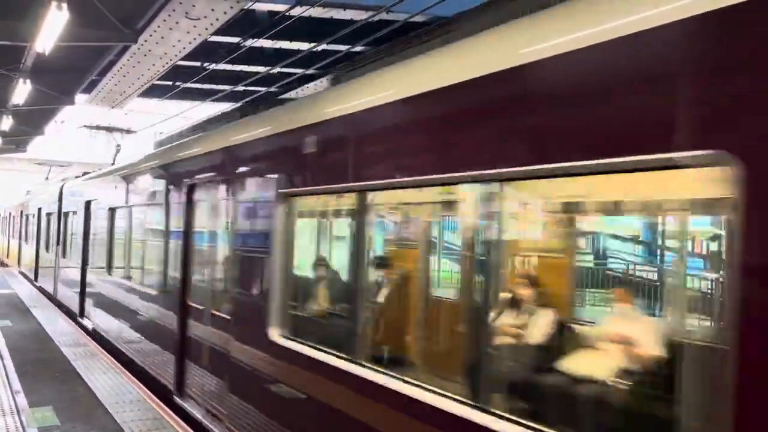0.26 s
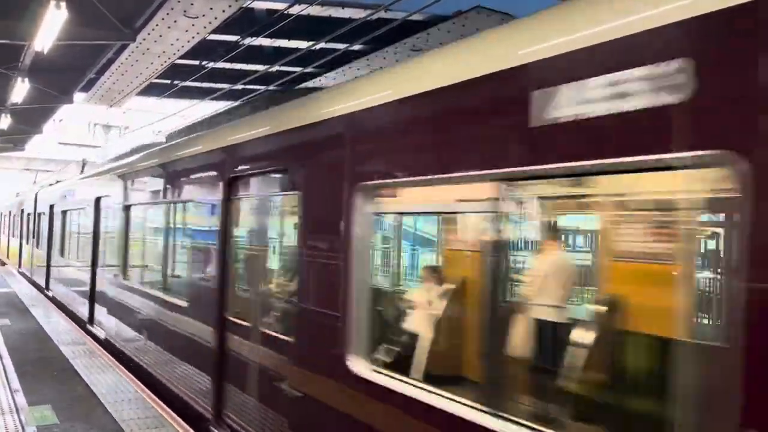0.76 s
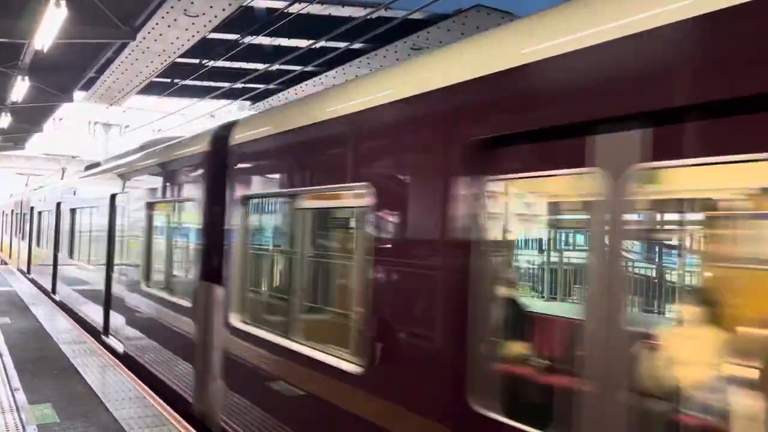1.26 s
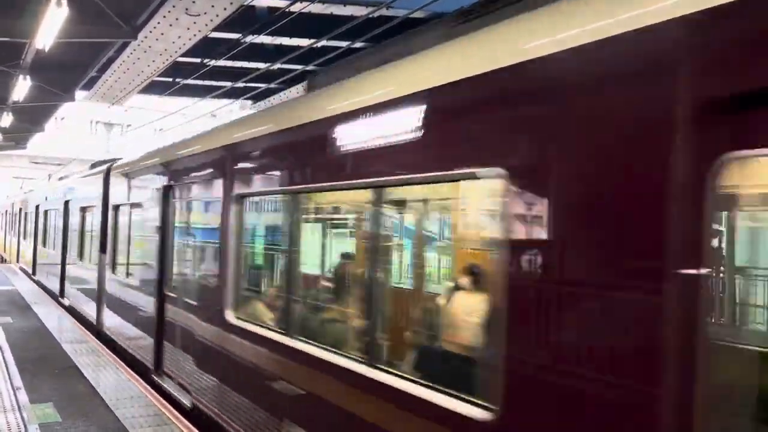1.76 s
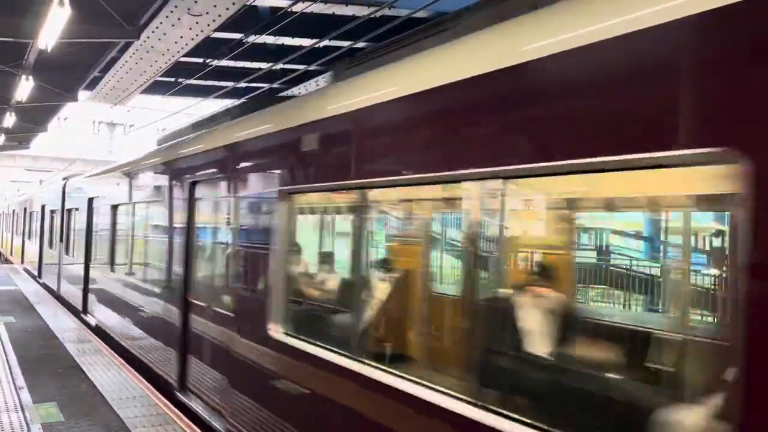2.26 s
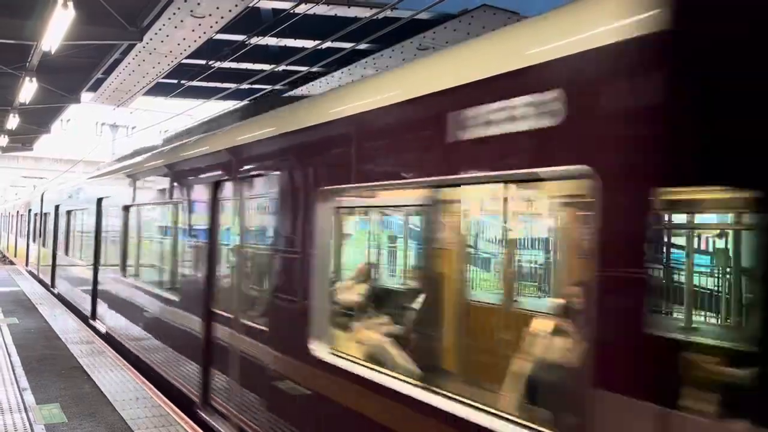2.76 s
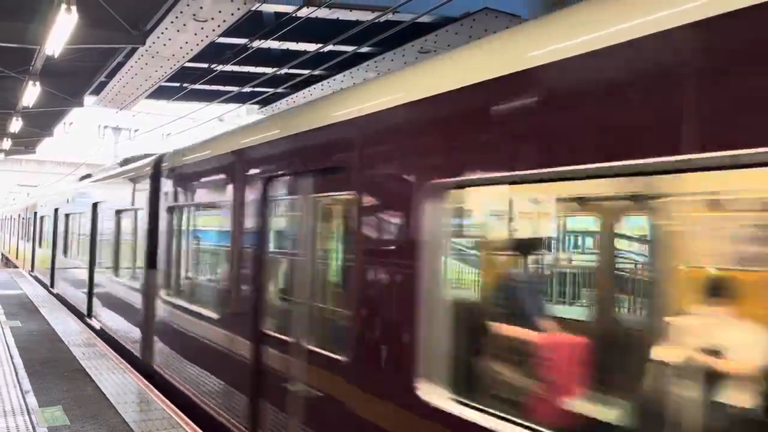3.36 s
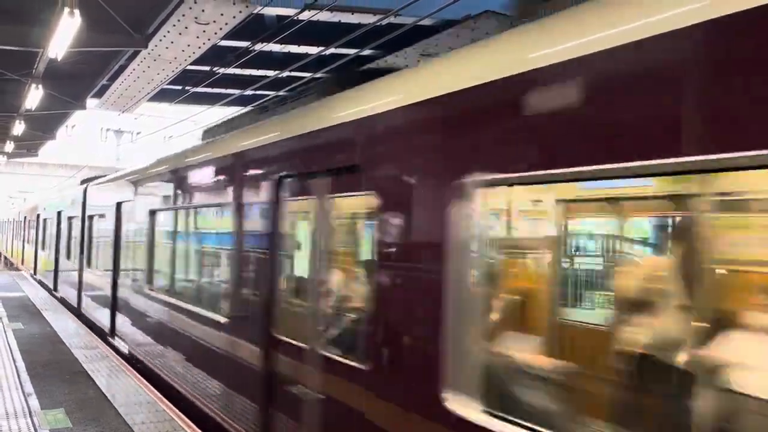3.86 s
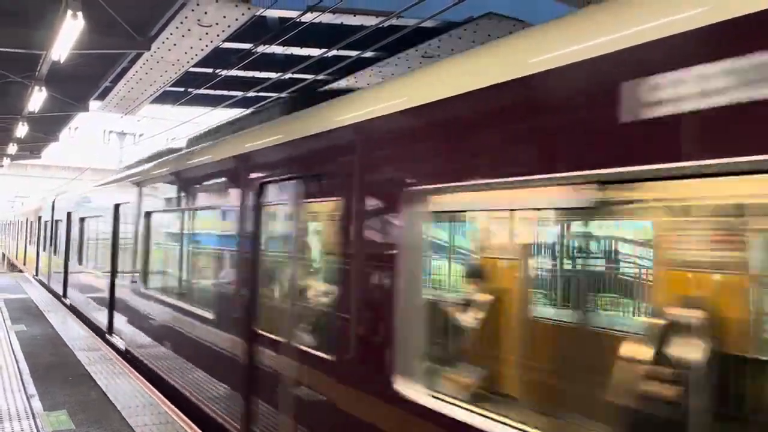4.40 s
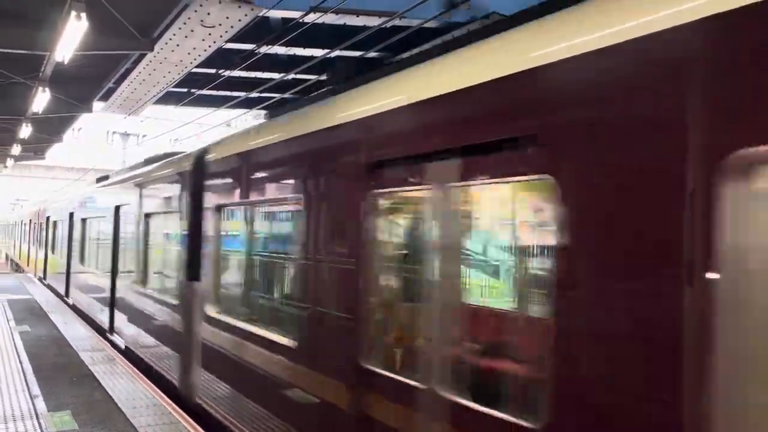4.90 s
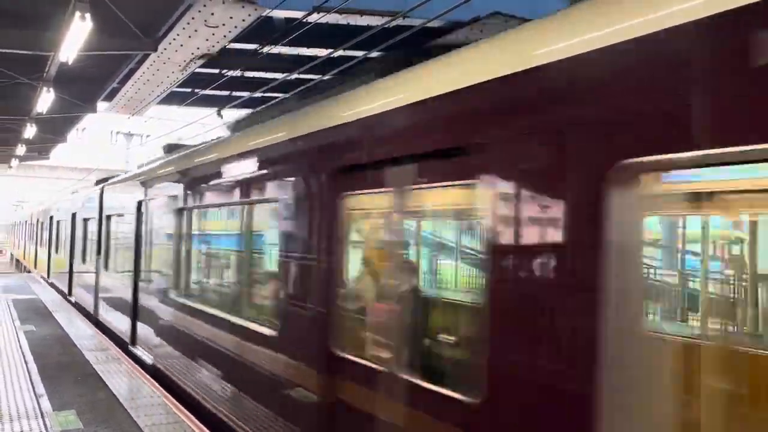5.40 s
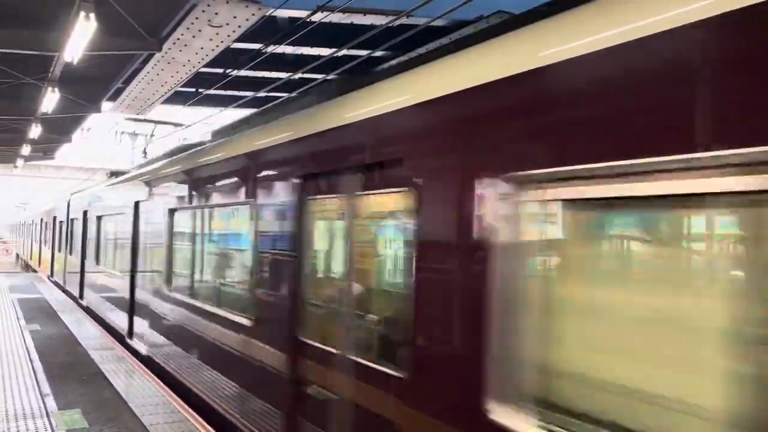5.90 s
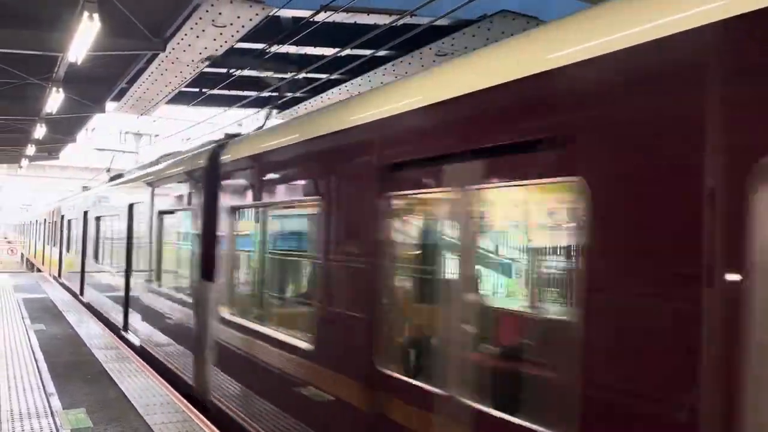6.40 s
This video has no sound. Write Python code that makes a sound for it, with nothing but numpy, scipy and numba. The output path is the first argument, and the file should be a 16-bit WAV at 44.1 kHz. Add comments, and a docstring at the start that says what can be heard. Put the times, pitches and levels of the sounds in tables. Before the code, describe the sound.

Very close stereo phone pickup on a station platform as train cars rush by, accelerating. Wheels roar continuously with a soft hiss; motors sing in wavering, slightly out-of-tune clusters that rise throughout, over a constant electrical hum. Wind from the cars first batters the microphone, then eases, returns in scattered low bumps and crackling puffs, and finally becomes dense.

```python
"""Commuter train gathering speed

An electric train gathers speed along a roofed platform, an arm's length from a phone.
Gears, motor fans and a fixed hum are clusters of detuned sines; all but the hum rise in pitch.
Wheels on rail roar as octave bands of noise. The slipstream buffets the microphone:
gust-shaped noise, with dull thumps made of sines whose pitch falls."""
import sys
import numpy as np
from scipy import signal
from scipy.fft import irfft, next_fast_len
from scipy.io import wavfile
from numba import njit

SR = 44100
rng = np.random.default_rng(int(sys.argv[2]) if len(sys.argv) > 2 else 0)


def persist_wave(psi):
    """Save psi, clipped to +-1, as 16-bit WAV."""
    counts = np.round(np.clip(psi, -1, 1) * 32767).astype(np.int16)
    wavfile.write(sys.argv[1], SR, np.atleast_2d(counts).T)


def volts_from_decibels(level):
    """Turn decibel levels (scalar or array-like) into linear amplitude factors."""
    exponent = np.asarray(level, float) / 20
    return 10 ** exponent


N = 293265
TIME = np.arange(N) / SR


def curves(table):
    """Linear interpolation: the columns of a timed table, one value per sample."""
    s, *columns = np.transpose(table)
    return [np.interp(TIME, s, column) for column in columns]


def along(table, hz):
    """Logarithmic frequency scale: reads (frequency, value) points along it."""
    f, value = np.transpose(table)
    return np.interp(np.log(np.maximum(hz, 1)), np.log(f), value)


def unit(x):
    """Normalisation of power: scales to rms 1."""
    return x / np.sqrt(np.mean(x ** 2))


def walk(rate):
    """Random modulation: Gaussian levels joined by straight lines, rate of them a second."""
    knots = rng.standard_normal(2500)
    return 1.2 * np.interp(TIME * rate, np.arange(len(knots)), knots)  # rms near 1


def pair(spectrum, likeness, lo_hz=0., hi_hz=SR):
    """Partial coherence: two ears share a mid noise and differ by a side noise, in a soft-edged band."""
    size = next_fast_len(N)
    hz = np.fft.rfftfreq(size, 1 / SR) + 1
    phases = np.exp(2j * np.pi * rng.random((2, len(hz))))
    mid, side = rng.standard_normal((2, len(hz))) * phases
    alike = np.clip(likeness(hz), -1, 1)
    edges = np.sqrt((1 + (lo_hz / hz) ** 6) * (1 + (hz / hi_hz) ** 6))
    gain = volts_from_decibels(along(spectrum, hz)) / edges
    common, opposed = np.sqrt(1 + alike) * mid, np.sqrt(1 - alike) * side
    return irfft(gain * np.array([common + opposed, common - opposed]), size)[:, :N]


# level difference between the ears: (frequency [Hz], left minus right [dB])
EAR_DIFFERENCE = [(500, 0.8), (1200, -1), (2300, 2), (4200, 6), (7500, 3), (12000, -9)]


def ear_gains(hz):
    """Interaural level difference: half of it raises the left, half lowers the right."""
    lean_db = along(EAR_DIFFERENCE, hz) / 2
    return volts_from_decibels([[lean_db], [-lean_db]])


# train speed heard as pitch: (time [s], gear mesh [Hz], motor fan blade [Hz])
SPEED = [(0.0, 273, 905), (0.7, 303.4, 963.4), (1.32, 329.4, 1081), (1.9, 349.3, 1122), (2.64, 372.5, 1141),
         (3.5, 392, 1213), (4.4, 416.1, 1318), (5.2, 434.7, 1354), (5.9, 450.7, 1385), (6.65, 466.9, 1417)]
# fan tones of the motors: (time [s], pitch spread [share of pitch], steady share [ratio])
FAN_SPREAD = [(0, .015, .6), (1, .015, .6), (1.35, .05, .9), (1.95, .05, .9), (2.3, .055, .3), (4, .055, 0),
              (5.5, .022, .8), (6.2, .012, 1.2), (6.45, .01, 1.6), (6.65, .018, .8)]
# gear tones: (tone, multiple of the mesh [ratio], pitch spread [share of pitch], steady share [ratio])
GEAR_ORDERS = [("mesh", 1, .06, 1.4), ("mesh x2", 2, .035, .3), ("mesh x4", 4, .03, 0),
               ("mesh x5", 4.85, .02, .3), ("mesh x6", 6, .042, .35), ("mesh x8", 7.9, .055, 0),
               ("mesh x10", 9.7, .05, 0)]


def motors():
    """Tooth and blade passing: gear and fan tones rise with speed; the hum stays put."""
    hum_hz = 112.3
    mesh_hz, fan_hz = curves(SPEED)
    out = whine("fan", fan_hz, *curves(FAN_SPREAD))
    for tone, order, spread, steady in GEAR_ORDERS:
        count = 5 if steady > .3 else 3
        gear = whine(tone, order * mesh_hz, spread, steady, count)
        out += gear * ear_gains(order * mesh_hz.mean())
    for order, tone in enumerate(("hum", "hum x2"), 1):
        # one channel of the hum feeds both ears
        out += whine(tone, np.full(N, order * hum_hz), .2 / order, 0)[0]
    return out


def whine(tone, hz, spread, steady, count=5):
    """Multipath interference: motors nearing or leaving sing a little off pitch, roughened by many paths."""
    waver_db, waver_per_s = 1.07, 11  # gaps and skirts of the cars break each tone up
    db, offset = passing(tone)
    out = np.zeros((2, N))
    rough_rate = 1.5 * np.mean(spread * hz)
    for off in np.linspace(-1, 1, count):
        detuning = offset / 100 + spread * (off + .15 * walk(6))
        phase = 2 * np.pi * np.cumsum(hz * (1 + detuning)) / SR
        gain = volts_from_decibels(1.8 * walk(12) - 7. * off ** 2)
        # only the middle motor has a steady part
        direct = (steady * (off == 0) + 0.67 * walk(rough_rate)) * np.sin(phase)
        # roof and car sides give each ear its own shifting mix of paths
        for ear in range(2):
            paths = walk(rough_rate) * np.sin(phase) + walk(rough_rate) * np.cos(phase)
            out[ear] += gain * (direct + paths)
    depth_db = waver_db / (1 + steady) ** 2  # steadier tones waver less
    return unit(out) * volts_from_decibels(db + depth_db * walk(waver_per_s))


# a tone swells while a unit that sings it rolls past:
# (tone, nearest time [s], level [dB], time scale of the swell [s], pitch offset of that unit [%])
PASSES = [("mesh", 1.11, -32, 0.1697, 0.12), ("mesh", 1.74, -30, 0.2597, -0.994),
          ("mesh", 2.52, -31.5, 0.33, -3), ("mesh", 2.8, -30, 0.369, 0.99),
          ("mesh", 3.26, -30.5, 0.22, 1.5), ("mesh", 3.65, -32.5, 0.2, 1), ("mesh", 4.3, -32.5, 0.16, 0.11),
          ("mesh", 4.66, -27.5, 0.05, .5), ("mesh", 4.76, -28, 0.084, .5), ("mesh", 4.88, -28, 0.04, -1.06),
          ("mesh", 4.97, -25.5, 0.08, 1.53), ("mesh", 5.065, -26, 0.039, 1.53),
          ("mesh", 5.7, -35.5, 0.42, 0.12), ("mesh", 5.6, -35, 0.15, 0.14),
          ("mesh", 6.45, -27.5, 0.084, 0.14), ("mesh x2", 0.16, -33, 0.503, -0.991),
          ("mesh x2", 1.495, -32.5, 0.3426, 0.12), ("mesh x2", 1.918, -34, 0.15, .5),
          ("mesh x2", 2.24, -31, 0.15, -.7), ("mesh x2", 2.6, -35, 0.21, -1),
          ("mesh x2", 3.08, -28.5, 0.23, -1.5), ("mesh x2", 3.6, -31.5, 0.297, -3),
          ("mesh x2", 4.09, -31, 0.244, -3.5), ("mesh x2", 4.47, -34, 0.121, -2.51),
          ("mesh x2", 4.85, -29, 0.131, -3.5), ("mesh x2", 5.15, -38, 0.12, -2.404),
          ("mesh x2", 5.89, -33.5, 0.22, 0.093), ("mesh x2", 6.23, -33.5, 0.11, -.5),
          ("mesh x5", 5.93, -42, .15, -.5), ("mesh x5", 6.3, -42.5, .16, -3),
          ("mesh x4", 2.25, -40, 0.33, 0.1023), ("mesh x4", 3.3, -42, .5, 0.1014),
          ("mesh x4", 4.76, -42, 0.3, 2), ("mesh x4", 5.95, -41, 0.12, 0.11),
          ("mesh x6", 0.16, -45, 0.408, 0.1017), ("mesh x6", 2.4, -38.5, 0.22, 0.497),
          ("mesh x6", 2.76, -35.5, 0.288, 0.0973), ("mesh x6", 3.2, -32.5, 0.25, -1),
          ("mesh x6", 3.55, -32, 0.2516, 0.501), ("mesh x6", 3.92, -36.5, 0.15, 0.505),
          ("mesh x6", 4.22, -32.5, 0.204, -0.508), ("mesh x6", 4.72, -36.5, 0.36, -2.2),
          ("mesh x6", 5.14, -37, 0.248, -1.5), ("mesh x6", 5.45, -38, 0.127, -2.2),
          ("mesh x6", 5.65, -41, .1, -2), ("mesh x6", 5.79, -37.5, .08, -1.5),
          ("mesh x6", 6.08, -41, 0.22, -2.5), ("mesh x6", 6.4, -40, 0.13, 0.99),
          ("mesh x6", 6.58, -40, 0.14, -2), ("mesh x8", 4.65, -41, 0.4, .1),
          ("mesh x8", 5.5, -42.5, 0.45, -1), ("mesh x10", 4.33, -42, .14, 2),
          ("mesh x10", 4.6, -44.5, .2, 1), ("mesh x10", 4.95, -42, 0.25, -.5),
          ("mesh x10", 5.8, -46.5, 0.64, -2), ("fan", 0.617, -38, 0.19, 0.09),
          ("fan", 1.365, -31, 0.099, 1), ("fan", 1.53, -30.5, 0.13, .5), ("fan", 1.72, -28.5, 0.16, 1),
          ("fan", 1.89, -30, 0.088, 1.497), ("fan", 2.12, -35, 0.15, 2), ("fan", 2.34, -32, 0.08, 1),
          ("fan", 2.54, -29.5, 0.1695, 0.094), ("fan", 2.72, -31.5, 0.08, .1),
          ("fan", 3.35, -36.5, 0.5, -3), ("fan", 4.3, -40.5, 0.2974, 0.096), ("fan", 5.05, -39, 0.2036, 1),
          ("fan", 5.4, -41, 0.14, 0.96), ("fan", 5.78, -35.5, 0.199, 1.5),
          ("fan", 6.08, -33.5, 0.199, 0.082), ("fan", 6.39, -33, 0.099, 0.083),
          ("fan", 6.6, -33, 0.045, 0.56), ("hum", 0.1, -34, .1, .1), ("hum", 0.63, -33.5, 0.19, .1),
          ("hum", 1.26, -28.5, 0.08, 0.13), ("hum", 1.5, -28.5, 0.21, 0.13), ("hum", 2.74, -36, 0.34, 0.12),
          ("hum", 3.21, -37, 0.15, 0.11), ("hum", 4.45, -36, .15, 0.11), ("hum", 4.8, -41, 0.099, .1),
          ("hum", 6.1, -35, 0.14, .1), ("hum x2", 0.078, -31.5, 0.083, 0.079),
          ("hum x2", 1.0, -35, 0.58, .1), ("hum x2", 1.58, -33, 0.19, 0.086),
          ("hum x2", 2.32, -29, 0.21, 0.073), ("hum x2", 3.5, -35, 0.15, 0.098),
          ("hum x2", 2.876, -29.5, 0.1, 0.085), ("hum x2", 5.14, -38.5, 0.45, 0.11),
          ("hum x2", 6.62, -33, 0.1, 0.091)]


def passing(tone):
    """Spreading loss: level summed over units that fade with distance; the loudest leads the pitch offset."""
    steepness = 2.63
    rows = [row[1:] for row in PASSES if row[0] == tone]
    power = np.array([volts_from_decibels(2 * db) / (1 + ((TIME - s) / half) ** 2) ** steepness
                      for s, db, half, _ in rows])
    total = power.sum(axis=0)
    offsets = np.array(rows)[:, -1]
    return 10 * np.log10(total), offsets @ power / total


# rolling roar: (time [s], level [dB], treble band against the rest [dB])
ROLLING = [(0.0, -28, 0), (1.15, -29, -0.5), (1.5, -26.5, 3), (1.9, -27.5, 0.5), (2.9, -26.5, -2.5),
           (3.5, -26.5, 2), (4.05, -25.5, 0), (5.2, -27, 0), (5.8, -26, 1), (6.65, -26, 1)]
# relative spectral density of the roar: (frequency [Hz], density [dB per Hz])
ROAR = [(40, -2), (70, -3.5), (130, -2.5), (250, -5), (450, -9.5), (800, -9), (1300, -11), (2000, -16),
        (2800, -18.5), (4300, -21), (6000, -32), (8200, -35), (11500, -42), (13800, -45)]
# likeness of the ears; the gap between the ports makes it swing in the treble:
# (frequency [Hz], left-right correlation [ratio, clipped to -1..1])
LIKENESS = [(100, 0.59), (350, 0.61), (900, 0.22), (1400, 0.061), (3000, 0.22), (6200, 0.29), (7400, -0.62),
            (7650, -1.16), (9300, -0.84), (9400, -0.57), (10100, 0.19), (11000, 1.05), (13300, 0.86),
            (14250, -1.8)]


def wheels():
    """Roughness excitation of wheel and rail: octave bands flicker alone, swelling as bogies pass."""
    drone_db = 2.5  # bands below 3 kHz, against the hiss above
    db, treble_db = curves(ROLLING)
    out = np.zeros((2, N))
    for hz in 30 * 2. ** np.arange(9):
        band = pair(ROAR, lambda f: along(LIKENESS, f), hz, 2 * hz)
        flicker_db = 0.5 * walk(3.92) + 1.29 * walk(13)
        balance_db = drone_db * (hz < 3000) + treble_db * (hz > 7000)
        out += band * volts_from_decibels(flicker_db + balance_db) * ear_gains(1.16 * hz)
    return unit(out) * volts_from_decibels(db)


# relative spectral densities of the wind noises: (frequency [Hz], density [dB per Hz])
RUMBLE = [(20, -32), (40, -11), (60, 7), (90, 0.5), (130, -7), (600, -89)]
BUFFET = [(50, -32), (95, 12.5), (115, 5.5), (160, 7), (240, -11.5), (350, -33), (1500, -92)]
FLUTTER = [(120, -8), (260, -1), (500, -2.5), (900, -14.5), (1500, -23), (5000, -100)]
SNAP = [(300, -17), (650, 3.5), (1100, -7.5), (1800, -14.5), (6000, -90)]
# strongest eddies: (time [s], level [dB], snap against the swing [dB],
# start pitch before wobble [Hz], life scale [s])
EDDIES = [(0.009, -16, -18, 400, .016), (0.052, -14, -16, 397, .012), (0.092, -16.5, -6, 402, 0.015),
          (0.12, -20.5, -22, 300, 0.012), (0.22, -18, -24, 278, 0.015), (0.274, -9, -16, 516, 0.0052),
          (0.31, -21, -18, 400, 0.0073), (0.36, -15, -9, 352, 0.0082), (0.405, -18, -20, 350, .008),
          (0.452, -17.5, -22, 397, 0.012), (0.54, -18, -18.5, 392, 0.0095), (1.046, -23, -20, 350, 0.0086),
          (1.127, -21.5, -20, 347, 0.0067), (1.195, -20, -20, 299, .008), (1.214, -19, -20, 300, .014),
          (1.252, -19, -25, 170, .018), (1.283, -14, -16, 610, 0.0075), (1.298, -16, -25, 160, .01),
          (1.756, -19, -18, 400, 0.0071), (1.861, -16.5, -18.5, 350, 0.0096),
          (1.899, -12.5, -6, 600, 0.008), (1.932, -18, -14, 403, 0.0092), (2.678, -12.5, -23, 452, 0.0054),
          (2.697, -14, -2, 783, 0.011), (2.715, -12.5, -7, 444, 0.0055), (2.821, -18.5, -20, 300, 0.014),
          (2.834, -23, -20, 503, 0.0062), (2.85, -15.5, -19, 480, 0.012), (2.879, -16, -22, 450, 0.0058),
          (2.893, -20, -25, 250, .012), (2.954, -17.5, 0, 700, 0.009), (3.408, -10.5, -20, 353, 0.0065),
          (3.548, -11, -24, 563, 0.011), (3.619, -12.5, -6, 425, 0.0092), (3.782, -15, -16, 456, 0.0078),
          (4.005, -14.5, -17.5, 457, 0.0079), (4.243, -16, -22, 382, 0.026), (5.124, -13, -18, 400, 0.008),
          (5.219, -13, -8, 396, .008), (5.229, -13.5, -25, 348, 0.014), (5.262, -14, -22, 352, 0.0093),
          (5.326, -12.5, -18, 604, 0.0054), (5.338, -17, -22, 251, .012), (5.356, -26, -14, 400, .008),
          (5.445, -21, -24, 230, 0.015), (5.655, -12.5, -20, 302, 0.0072), (5.758, -17.5, 6.5, 710, 0.0078),
          (5.771, -15, 0, 300, 0.0057), (5.787, -21, 0.5, 387, 0.011), (5.797, -11, -6, 201, 0.01),
          (5.903, -11.5, -11, 397, 0.013), (5.939, -10, -10, 590, 0.014), (5.965, -23, 0, 450, .008),
          (5.979, -17, -2, 406, 0.0064), (6.195, -16.5, -10, 403, 0.011), (6.348, -17.5, -20, 280, 0.014),
          (6.405, -19, -8, 597, 0.015), (6.46, -18, -6, 500, 0.0089), (6.479, -14, -9, 603, 0.0057),
          (6.503, -12, -24, 250, 0.013), (6.533, -9.5, -22, 450, 0.0047), (6.565, -14.5, -14, 448, 0.0089),
          (6.571, -12.5, -3, 713, .006), (6.587, -11, -29, 220, 0.015), (6.618, -12.5, -24, 340, 0.019)]


def slipstream():
    """Turbulent pressure on the ports: rumble, buffeting, choppy flutter and single eddies."""
    rumble_db, buffet_db, flutter_db = -5.5, -9.5, -6.5  # against the wind level
    deep = wind_noise(RUMBLE, 0.99) * volts_from_decibels(wind_db(-0.81) + rumble_db)
    low = wind_noise(BUFFET, 0.48) * volts_from_decibels(wind_db(0) + buffet_db + 2.1 * walk(25))
    chop = wind_noise(FLUTTER, 0.78) * volts_from_decibels(wind_db(0.77) + flutter_db + 1.7 * walk(50))
    rows = np.array(EDDIES)
    rows[:, 1:3] = volts_from_decibels(rows[:, 1:3])
    start_phase = 2 * np.pi * rng.random((len(rows), 1))
    rows = np.column_stack([rows, start_phase])
    wobble = volts_from_decibels(2.225 * walk(90))
    swing, snap = eddies(rows, end_hz=87.0, fall=0.00544, wobble=wobble, peaking=0.26)
    return deep + low + chop + swing + snap * wind_noise(SNAP, 0.12)


def wind_noise(spectrum, correlation):
    """Uniform coherence: noise of rms 1 with one left-right correlation at all frequencies."""
    return unit(pair(spectrum, lambda f: np.full(len(f), correlation)))


@njit
def eddies(rows, end_hz, fall, wobble, peaking):
    """Vortex pressure pulse: a swing whose pitch falls fast, wobbles, holds and dies; also its snap envelope."""
    out, snap = np.zeros(N), np.zeros(N)
    for s, size, crack, hz, life, turn in rows:
        start = int(s * SR)
        for i in range(min(int(6 * life * SR), N - start)):
            t = i / SR
            pitch = end_hz + (hz - end_hz) * np.exp(-t / fall)
            turn += 2 * np.pi * pitch * wobble[start + i] / SR
            rise = 1 - np.exp(-t / .0015)
            envelope = rise * np.exp(-(t / life / 1.5) ** 2)
            # the second harmonic sharpens the crests
            out[start + i] += size * envelope * (np.sin(turn) - peaking * np.cos(2 * turn))
            snap[start + i] += size * crack * min(t / .0005, 1.) * np.exp(-2 * t / life)
    return out, snap


# steady draught along the train: (time [s], level [dB], brightness [dB])
DRAUGHT = [(0.0, -36, 1), (0.5, -34.5, 4), (0.9, -39, -2), (1.2, -34, 3), (1.7, -28, 10), (2.2, -30.5, 6.5),
           (2.6, -30.5, 0), (3.1, -30, 8), (3.5, -27.5, 15), (3.9, -31.5, 7), (4.2, -32, -1),
           (4.6, -37, -6.5), (5.1, -29, 4), (5.5, -27, -4.5), (6.1, -35.5, -9.5), (6.65, -23.5, -5)]
# gusts over it: (time [s], level [dB], half length to 1/e of the power [s],
# brightness, flutter up and rumble down [dB])
GUSTS = [(0.02, -18, 0.077, 0), (0.109, -16.5, 0.015, -2), (0.23, -29, 0.026, -9), (0.3, -22, 0.027, -2),
         (0.46, -25, 0.041, -1), (0.55, -28, 0.015, -1), (1.07, -32.5, 0.034, 5.5), (1.2, -28, 0.04, 4),
         (1.29, -23, 0.014, 2), (1.45, -25, 0.038, -3), (1.62, -31, 0.043, 4.5), (1.74, -26, .035, -5),
         (1.919, -17.5, 0.061, 0.5), (2.04, -23.5, 0.053, -4), (2.33, -27, 0.029, 3),
         (2.451, -22, 0.037, 0.5), (2.57, -25, 0.039, 4.5), (2.7, -23.5, 0.037, 7), (2.84, -26, 0.046, -8),
         (2.95, -31, 0.028, -11), (3.42, -32, 0.047, 8), (3.56, -25.5, 0.072, -1), (3.74, -22.5, 0.049, 1),
         (3.97, -24.5, 0.07, -3), (4.25, -23.5, 0.027, 5), (4.275, -21.5, 0.047, -4.5),
         (5.07, -23, 0.032, 1.5), (5.255, -22.5, 0.053, 4.5), (5.35, -23, 0.054, -1), (5.47, -37, .03, -6),
         (5.66, -23.5, 0.048, 3), (5.768, -22, 0.0087, 4), (5.8, -19, 0.018, 1), (5.912, -16, 0.02, -2.5),
         (5.965, -19.5, 0.022, 3), (6.2, -21.5, 0.021, 2), (6.36, -31, 0.019, -7), (6.43, -23, 0.023, 0),
         (6.49, -20, 0.021, 3), (6.58, -20.5, 0.068, -0.5)]


def wind_db(tilt):
    """Addition of powers: draught plus bell-shaped gusts; tilt above 0 favours bright ones, below 0 dull."""
    db, bright_db = curves(DRAUGHT)
    power = volts_from_decibels(2 * (db + tilt * bright_db))
    for s, gust_db, half, gust_bright_db in GUSTS:
        bell = np.exp(-((TIME - s) / half) ** 2)
        power = power + volts_from_decibels(2 * (gust_db + tilt * gust_bright_db)) * bell
    return 10 * np.log10(power)


def scene():
    """Superposition: motors, wheels and slipstream add linearly."""
    return motors() + wheels() + slipstream()


def top_cut(x):
    """Nothing passes above the cut-off."""
    return signal.sosfilt(signal.butter(12, 14320, fs=SR, output="sos"), x)


def record(dry):
    """High-pass filtering: the phone cuts the deepest rumble, below 38 Hz."""
    high_pass = signal.butter(4, 38, "high", fs=SR, output="sos")
    mix = signal.sosfilt(high_pass, dry)
    return top_cut(mix)


dry = scene()
out = record(dry)
persist_wave(out)
```